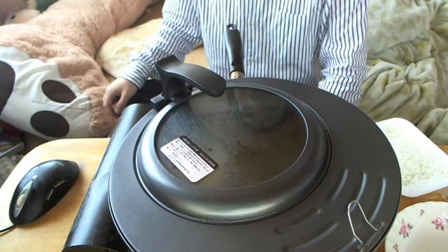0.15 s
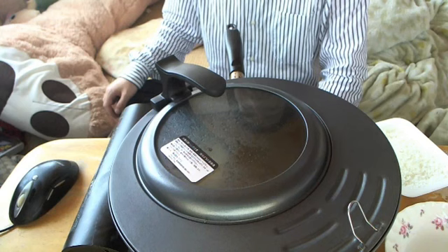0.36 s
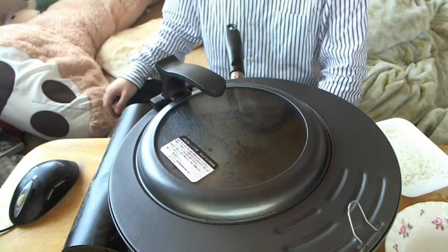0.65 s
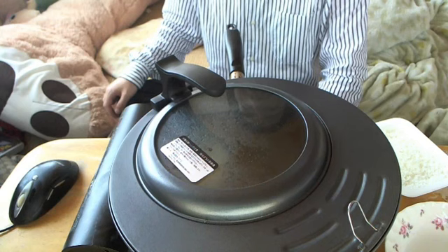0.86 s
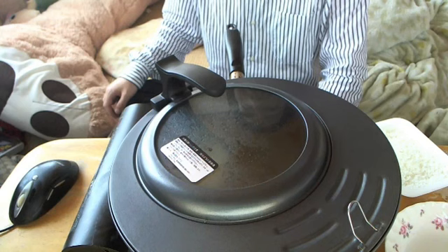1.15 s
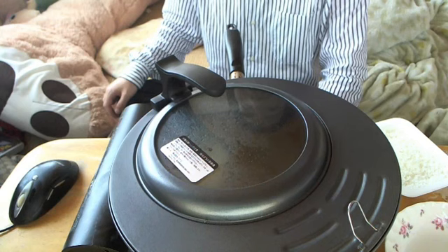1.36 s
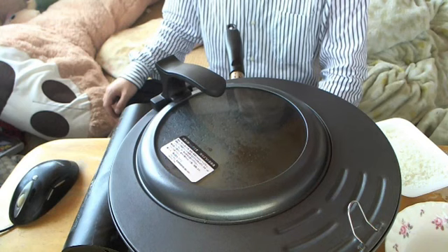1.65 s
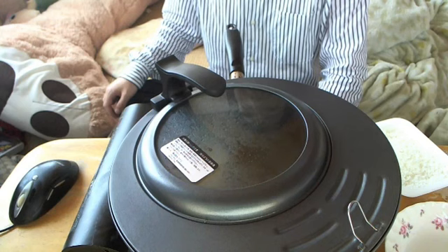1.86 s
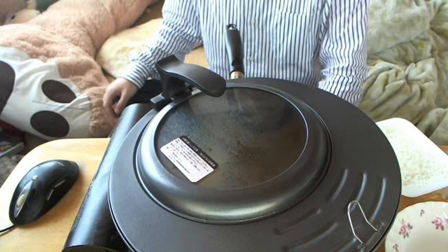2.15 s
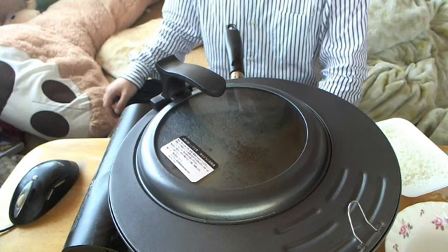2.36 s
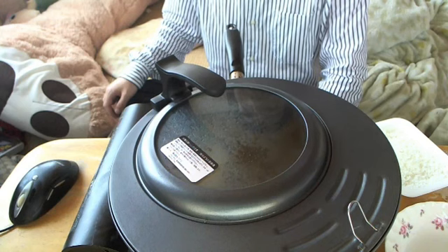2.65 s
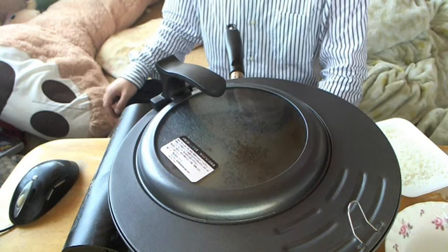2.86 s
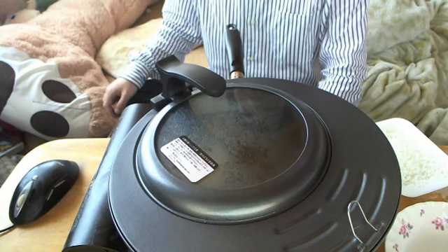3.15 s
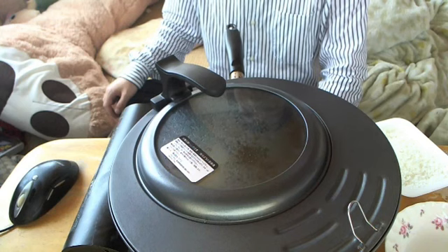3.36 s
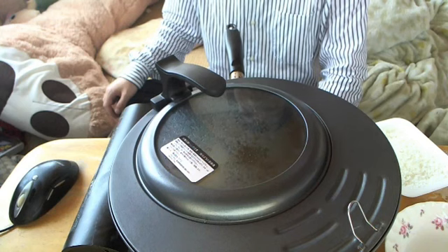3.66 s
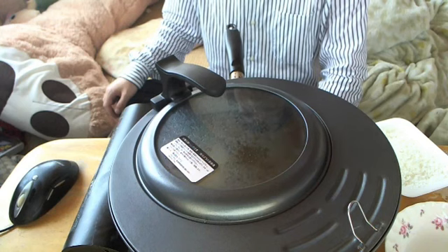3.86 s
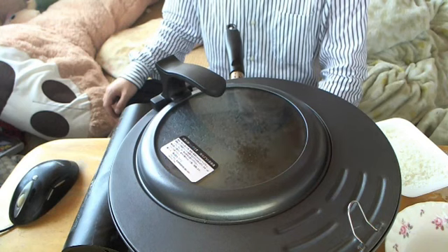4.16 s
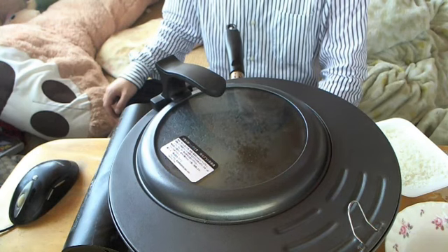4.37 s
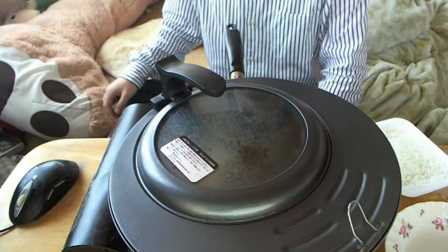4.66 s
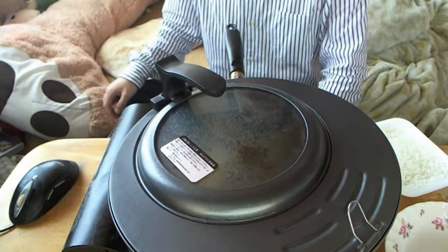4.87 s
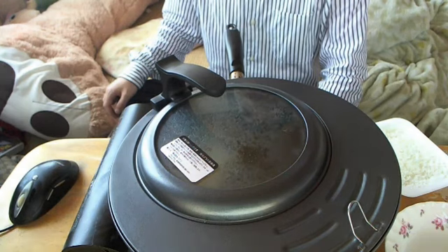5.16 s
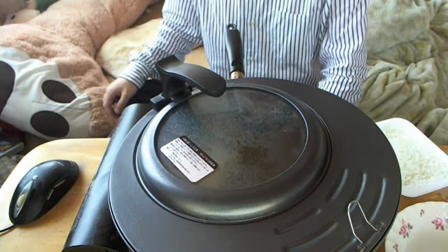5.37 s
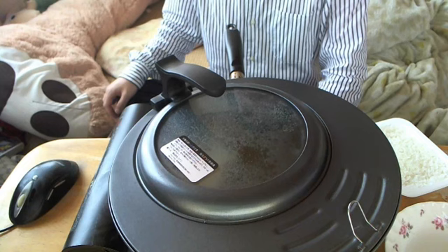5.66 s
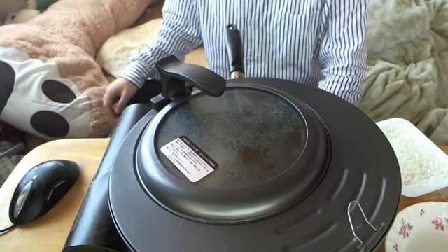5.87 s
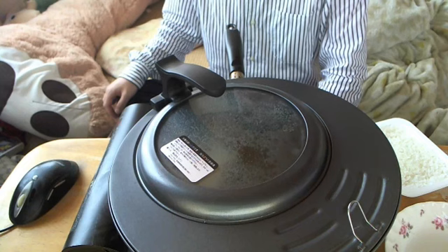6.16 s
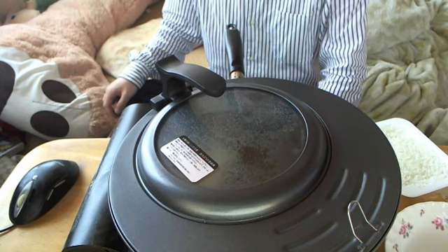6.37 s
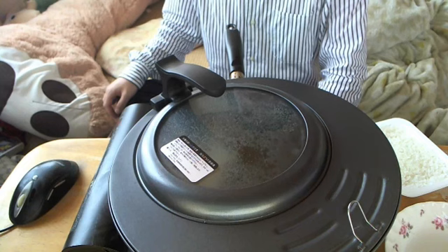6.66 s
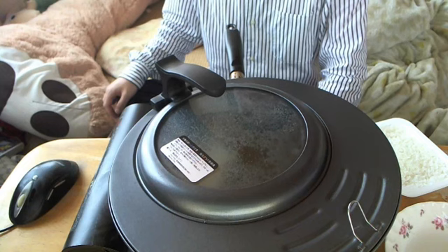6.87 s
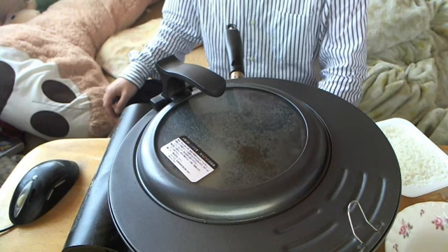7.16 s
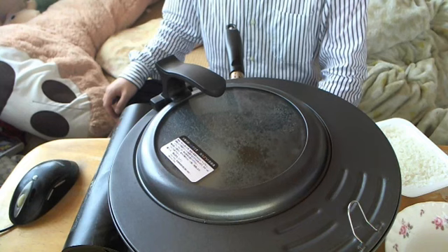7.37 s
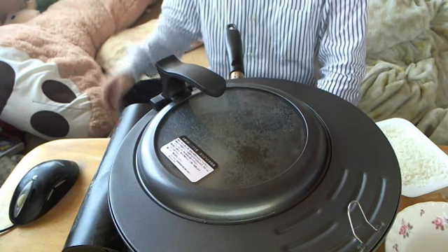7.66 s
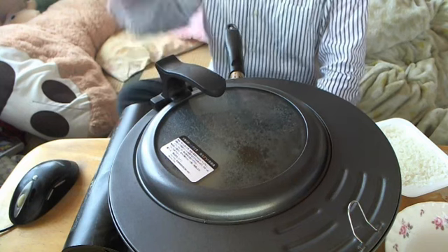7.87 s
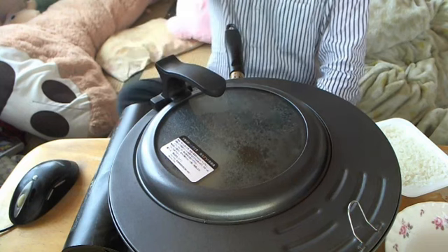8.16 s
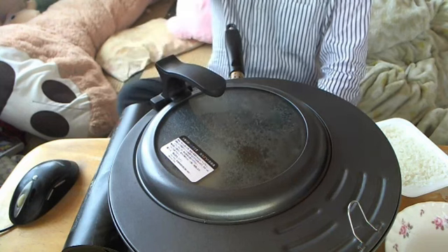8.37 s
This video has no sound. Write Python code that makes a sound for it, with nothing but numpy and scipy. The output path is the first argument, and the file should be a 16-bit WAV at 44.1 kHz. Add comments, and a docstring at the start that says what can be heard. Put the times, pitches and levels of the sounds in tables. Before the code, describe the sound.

Food fries in hot oil inside a closed metal pot, close to the microphone in a room. A soft, steady sizzle and a wavering low rumble run underneath many small, irregular crackles and pops that ring briefly in the pot. A louder, hollow pop comes about a third of the way in, followed by a sharp spit of oil against the lid. The crackling carries on, with another cluster of stronger pops near the end.

```python
"""Steam bubbles burst in frying oil under the closed lid of a pot, close to a small microphone.
Each burst is a flurry of clicks in a pitch range of its own that rings in the pot, with froth around it.
A few big ones splash oil on the lid and make the pot shudder. Underneath are many small bursts,
a steady sizzle and a wavering low rumble; the table under the pot adds a faint, short echo."""
import sys
import numpy as np
from scipy import signal
from scipy.fft import rfft, irfft
from scipy.io import wavfile
from scipy.ndimage import uniform_filter1d

SR = 44100
rng = np.random.default_rng(int(sys.argv[2]) if len(sys.argv) > 2 else 0)


def unload_wav(signal):
    """Save mono or channel-first audio to the path in sys.argv[1] as 16-bit WAV at rate SR, clipped to [-1, 1]."""
    wavfile.write(
        sys.argv[1],
        SR,
        np.round(np.clip(np.atleast_2d(signal).T, -1, 1) * 32767).astype(np.int16),
    )


N = 375732

# Steam bubbles that burst. Each row: start in seconds, level in dB, pitch in Hz.
STEAM_POPS = [(0.004, -28.5, 363), (0.006, -29, 923), (0.164, -39, 2500), (0.175, -36.5, 1120),
              (0.273, -40, 2420), (0.321, -44.5, 2100), (0.446, -47, 1630), (0.475, -38.5, 1730),
              (0.478, -47.5, 4100), (0.554, -39.5, 665), (0.646, -37.5, 1670), (0.693, -33, 5440),
              (0.702, -46, 7340), (0.733, -31, 2050), (0.763, -32.5, 1720), (0.778, -38, 520),
              (0.805, -46.5, 4170), (0.983, -31.5, 610), (1.08, -46.5, 4900), (1.124, -40, 2000),
              (1.178, -33, 4070), (1.23, -35, 1316), (1.27, -37.5, 347), (1.312, -35, 2390),
              (1.314, -42.5, 5140), (1.33, -43, 346), (1.368, -41.5, 3980), (1.426, -38.5, 5800),
              (1.444, -46, 5940), (1.486, -41, 306), (1.581, -44.5, 2000), (1.657, -37.5, 1210),
              (1.667, -38.5, 4900), (1.671, -29, 2000), (1.796, -43.5, 1530), (1.935, -28.5, 2000),
              (1.972, -29, 334), (1.985, -36.5, 1700), (2.059, -41, 5800), (2.062, -26.5, 1640),
              (2.103, -41.5, 5100), (2.106, -38, 2000), (2.158, -29.5, 1620), (2.176, -38.5, 5200),
              (2.19, -37.5, 3040), (2.222, -44.5, 7500), (2.484, -40.5, 5180), (2.715, -41.5, 1770),
              (2.734, -33, 1840), (2.735, -42.5, 5750), (2.781, -35.5, 201), (2.874, -48.5, 4500),
              (2.997, -33.5, 2080), (3.008, -18, 320), (3.006, -14.5, 596), (3.015, -21, 870),
              (3.037, -28.5, 2050), (3.059, -27, 830), (3.059, -39.5, 5640), (3.127, -37.5, 4880),
              (3.182, -41, 5260), (3.205, -34.5, 1490), (3.272, -41, 2280), (3.341, -35, 1990),
              (3.351, -38, 493), (3.442, -30, 2000), (3.627, -41.5, 1990), (3.717, -41, 2000),
              (3.783, -36, 5220), (3.783, -36.5, 1570), (3.831, -14.5, 2980), (3.874, -22, 299),
              (3.968, -34, 2670), (3.98, -31.5, 302), (4.107, -38.5, 3340), (4.182, -42.5, 1630),
              (4.327, -50, 7200), (4.356, -42.5, 2520), (4.481, -40, 4970), (4.547, -38, 1790),
              (4.554, -41.5, 4580), (4.627, -42.5, 5220), (4.661, -38.5, 368), (4.66, -32, 1300),
              (4.701, -31, 946), (4.709, -35.5, 347), (4.754, -39.5, 3640), (4.806, -39, 5150),
              (4.851, -40, 3570), (4.936, -34.5, 368), (4.976, -33, 1780), (5.008, -29.5, 1200),
              (5.05, -30.5, 2000), (5.09, -42.5, 813), (5.23, -48.5, 3800), (5.338, -40, 2130),
              (5.397, -20, 1224), (5.399, -46.5, 5050), (5.406, -24, 473), (5.481, -32, 2000),
              (5.605, -43.5, 1970), (5.696, -42, 2270), (5.697, -47, 4950), (5.921, -39, 3830),
              (5.962, -37, 1840), (6.013, -41, 6840), (6.025, -28.5, 1530), (6.052, -37, 5040),
              (6.154, -34.5, 5000), (6.156, -40, 2700), (6.211, -45, 1600), (6.271, -40, 5200),
              (6.293, -38, 5530), (6.299, -40, 2000), (6.355, -38, 5130), (6.424, -27.5, 2000),
              (6.476, -44.5, 5760), (6.599, -37.5, 4940), (6.602, -36, 1760), (6.624, -33.5, 1776),
              (6.631, -32, 955), (6.686, -33.5, 1200), (6.709, -37.5, 1900), (6.746, -27.5, 1650),
              (6.9, -40, 1770), (6.922, -47, 4800), (6.982, -40, 308), (7.015, -30.5, 256),
              (7.029, -36, 1530), (7.033, -33.5, 694), (7.07, -49, 4230), (7.103, -38.5, 4800),
              (7.104, -47.5, 8260), (7.129, -37.5, 5400), (7.185, -37, 5170), (7.211, -44, 2000),
              (7.297, -36, 5700), (7.385, -37, 2000), (7.401, -34.5, 2000), (7.448, -26.5, 313),
              (7.447, -21.5, 550), (7.54, -32, 334), (7.544, -21, 1230), (7.648, -34, 820),
              (7.725, -27, 1000), (7.734, -24, 325), (7.744, -29, 365), (7.742, -18.5, 844),
              (7.75, -26.5, 2800), (7.784, -43, 775), (7.832, -39.5, 6170), (7.834, -43.5, 3040),
              (7.857, -48, 5100), (7.892, -46.5, 4270), (7.972, -27, 1300), (7.98, -39.5, 318),
              (8.169, -51, 3700), (8.43, -45, 765)]
# Oil thrown on the lid. Each row: start in seconds, level in dB, pitch in Hz, length in ms.
LID_SPLASHES = [(0.099, -36.5, 7940, 10.6), (3.808, -9.5, 4540, 30), (3.876, -16, 6200, 12),
                (3.972, -42, 6400, 9.9), (7.746, -24.5, 5050, 18.7)]
# The pot's air and metal. Each row: resonance in Hz, width in Hz, level in dB over the broad response.
POT_MODES = [(194.4, 56, 16.5), (334, 48, 11.5), (610, 980, 4.5), (833.6, 20, 14), (1056, 46, 17),
             (1670, 65, 8.5), (2000, 65, 11.5), (2420, 430, 0.5), (2784, 14.5, 8), (3280, 134, -16),
             (3457, 39, 8.5), (3613, 42, 8.5), (3880, 26, 7), (4195, 120, 7.5), (4680, 15, 5.5),
             (5030, 325, 7), (5420, 27, 9), (6180, 106, 4.5), (6890, 53, 6.5), (7200, 83, 2.5),
             (8200, 104, 3.5), (8830, 17, 3)]
# How wide a pop's band is. Each row: pitch in Hz, width as a ratio of the pitch.
BREADTH_BY_PITCH = [(330, 1), (1200, 1), (2500, 1), (5500, 0.59), (10000, 0.9)]


def amp(db):
    """Gain of a dB value."""
    return 10 ** (np.asarray(db) / 20)


def at_hz(points, hz):
    """A curve read on a log-frequency axis."""
    point_hz, values = np.transpose(points)
    return np.interp(np.log(hz), np.log(point_hz), values)


def bins(size):
    """Frequencies in Hz of an FFT of that size."""
    return np.maximum(np.arange(size // 2 + 1) * SR / size, 1)


def band(f, hz, width_hz):
    """Response of a resonance, 1 at its peak."""
    return 1 / (1 + 1j * (f - hz * hz / f) / width_hz)


def drift(rate_hz):
    """A slow random wander with a spread of 1."""
    hop, settle = 40, 2000
    pole = np.exp(-2 * np.pi * rate_hz * hop / SR)
    noise = rng.standard_normal(N // hop + settle + 2)
    slow = signal.lfilter([1], [1, -2 * pole, pole * pole], noise)[settle:]
    return np.interp(np.arange(N) / hop, np.arange(len(slow)), slow / slow.std())


def pot(f, boost_db=0, lid_cut_hz=8730):
    """The closed pot: resonances, at least 25 Hz wide, on a broad response; the lid muffles the top."""
    hz, width, db = np.transpose(POT_MODES)
    rings = 1 + amp(db + boost_db) @ band(f, hz[:, None], np.maximum(width, 25)[:, None])
    return rings / (1 + 1.2j * f / lid_cut_hz - (f / lid_cut_hz) ** 2) ** 2


def bursts(rows, breadth, rise, grain_db, sputter_db, fade_db, ring_db=0, size=8192):
    """Flurries of uneven clicks that swell, sputter and die, coloured by their pitch and by the pot."""
    start_s, db, hz, ms = np.transpose(rows)[:, :, None]
    t, f = np.arange(size // 2) * 1000 / SR / ms, bins(size)   # t and rise are in burst lengths
    noise, grain, chance = rng.standard_normal((len(rows), 3, size // 2)).swapaxes(0, 1)
    lumps = uniform_filter1d(uniform_filter1d(chance, size=130), size=130)   # a few ms each
    clicks = noise * amp(grain_db * grain + sputter_db * lumps / lumps.std())
    own_rise = rise * amp(2.5 * chance[:, :1])   # some bursts crack, others swell
    swell = 1 - np.exp(-(t / own_rise) ** 2)
    flurry = clicks * swell * amp(-9.5 * t - fade_db * t * t)
    body = band(f, hz, breadth * hz) ** 4
    bubble_note = amp(-5) * band(f, hz, 0.12 * hz)
    spray = amp(-27) * f / (f + hz) / (1 + (f / hz / 6.7) ** 2) ** 2   # reaches far above the pitch
    ring = pot(f, ring_db + 3 * grain[:, -len(POT_MODES):])   # each burst excites the modes differently
    sound = irfft(rfft(flurry, size) * (body * (1 + bubble_note) + spray) * ring, size)
    peak_power = uniform_filter1d(sound ** 2, size=350).max(axis=1, keepdims=True)   # loudest 8 ms
    sound *= amp(db) / np.sqrt(peak_power)
    out = np.zeros(N + size)
    for start, burst in zip(np.clip(start_s[:, 0] * SR, 0, N).astype(int), sound):
        out[start:start + size] += burst
    return out[:N]


def sizzle_and_port_noise(level_db):
    """Countless tiny bubbles: flickering noise through the pot. The microphone ports add their own."""
    # The sizzle before the pot colours it. Each row: frequency in Hz, relative density in dB.
    sizzle_colour = [(30, -22), (106, -17), (192, -9), (273, -10.5), (739, -10), (1490, -16.5), (2000, -15),
                     (3140, -29.5), (5040, -18.5), (7150, -19), (10000, -23), (15500, -32)]
    # Noise of the ports. Each row: frequency in Hz, density in dB on the sizzle's scale.
    port_colour = [(30, -36), (60, -44), (200, -6.5), (700, -23.5), (4000, -62), (10000, -57)]
    f = bins(N)
    spectrum = rfft(rng.standard_normal(N)) * amp(at_hz(sizzle_colour, f)) * np.abs(pot(f)) ** 0.9
    port_noise = irfft(rfft(rng.standard_normal(N)) * amp(at_hz(port_colour, f)), N)
    gain = amp(level_db) / irfft(spectrum, N).std()
    edges_hz = [0, 140, 280, 600, 1300, 2600, 4200, 6500, SR]
    common_db, sizzle = 1.2 * drift(3.0), 0
    for low, high in zip(edges_hz, edges_hz[1:]):
        flicker_db = 2.5 if low == 140 else 1.2   # the rumble near the lowest resonance wavers most
        part = irfft(spectrum * (f >= low) * (f < high), N)
        sizzle += part * amp(common_db + flicker_db * drift(5.0))
    return gain * sizzle, gain * port_noise


def small_bursts(count, low_hz, pitch_span_db, least_db, spread_db, ms, breadth=0.45):
    """Faint bubbles of random pitch and length; about a third trail the pops, the rest fall anywhere."""
    when, loud, pitch, length, parent, lag, trails = rng.random((count, 7)).T
    pop_s = np.array(STEAM_POPS)[(parent * len(STEAM_POPS)).astype(int), 0]
    trailing_s = pop_s - 0.077 * np.log(1 - lag)   # 77 ms later on average
    start_s = np.where(trails < 0.35, trailing_s, when * N / SR)
    level_db = least_db - spread_db * np.log(1 - 0.95 * loud)
    rows = np.transpose([start_s, level_db, low_hz * amp(pitch_span_db * pitch), ms * (0.19 + length)])
    return bursts(rows, breadth, rise=0.67, grain_db=3.5, sputter_db=1.0, fade_db=5.5, size=4096)


def froth(rows):
    """Froth around each pop: a murmur before it and a soft bubbling after, both slightly higher."""
    # Each row: delay in pop lengths, level in dB relative to the pop, pitch ratio, length ratio.
    froth_layers = [(-0.79, -17, 1.08, 2.1), (0.7, -16, 1.07, 1.5)]
    bubbles = np.array([(s + lag * ms / 1000, db + offset_db, hz * higher, ms * longer)
                        for s, db, hz, ms in rows for lag, offset_db, higher, longer in froth_layers])
    breadth = at_hz(BREADTH_BY_PITCH, bubbles[:, 2:3])
    return bursts(bubbles, breadth, rise=0.44, grain_db=3.5, sputter_db=5.0, fade_db=3.0)


def oil_splashes():
    """Oil hits the lid: a bright, broad hiss that sets the pot ringing hard."""
    return bursts(LID_SPLASHES, breadth=2.75, rise=0.21, grain_db=1.5, sputter_db=3.5, fade_db=0.2,
                  ring_db=22.0)


def shudder_rows():
    """The pot shudders under each splash: burst rows for a few lower, longer pops."""
    # Each row: pitch in Hz, level in dB relative to the splash, length in splash lengths.
    shudder = [(320, -13, 1.5), (1200, -13.5, 1.5), (2500, -28.5, 2.8)]
    return [(s, db + offset_db, hz, ms * longer)
            for s, db, _, ms in LID_SPLASHES for hz, offset_db, longer in shudder]


def pop_rows():
    """Burst rows for the steam bubbles, each as long as its pitch dictates."""
    # Each row: pitch in Hz, length in ms.
    length_by_pitch = [(330, 15.3), (500, 17), (1000, 24), (2000, 20), (5500, 15)]
    return [(s, db, hz, at_hz(length_by_pitch, hz)) for s, db, hz in STEAM_POPS]


def steam_pops(rows):
    """Steam bubbles burst one by one, each with a quick attack and a grainy tail."""
    # Each row: pitch in Hz, swell time in burst lengths.
    rise_by_pitch = [(330, 0.16), (1200, 0.16), (2500, 0.17), (6000, 0.26)]
    hz = np.array(rows)[:, 2:3]
    breadth, rise = at_hz(BREADTH_BY_PITCH, hz), at_hz(rise_by_pitch, hz)
    return bursts(rows, breadth, rise, grain_db=3.0, sputter_db=2.0, fade_db=1.0)


def microphone(sound, port_noise):
    """The two ports differ a little in colour; table echo and port noise reach them in opposite phase."""
    # Each row: frequency in Hz, level of left over right in dB.
    balance = [(60, 5), (170, 3), (500, 0.4), (1200, 0.9), (2200, 0), (3600, 0.5), (4600, 1.5),
               (5500, -1.3), (6500, 1), (8000, -0.5), (10000, -0.5)]
    mid, f = rfft(sound), bins(N)
    tilt = amp(at_hz(balance, f) / 2)
    echo_colour = amp(-18.5) * band(f, 3720, 1200) ** 2 + amp(-39) * band(f, 4700, 2500) ** 2
    table_echo = echo_colour * np.exp(-2j * np.pi * f * 0.00057)   # 0.57 ms late
    left = irfft(mid * (tilt + table_echo), N) + port_noise
    right = irfft(mid * (1 / tilt - table_echo), N) - port_noise
    return np.array([left, right])


def scene():
    """The frying pot stands straight in front of the microphone."""
    sizzle, port_noise = sizzle_and_port_noise(level_db=-53)
    rows = pop_rows() + shudder_rows()
    foreground = steam_pops(rows) + oil_splashes() + froth(rows)
    spits = small_bursts(1000, low_hz=1300, pitch_span_db=15.5, least_db=-64, spread_db=5.5, ms=13.4)
    droplets = small_bursts(260, low_hz=4000, pitch_span_db=8, least_db=-65, spread_db=4.5, ms=11,
                            breadth=1.7)
    glugs = small_bursts(90, low_hz=173.8, pitch_span_db=13.5, least_db=-51.5, spread_db=0, ms=28)
    return microphone(sizzle + spits + droplets + glugs + foreground, port_noise)


def record(dry):
    """Peaks are rounded near full scale; the deepest bass and the very top are cut."""
    ceiling, low_cut_hz, high_cut_hz = 1.1, 42.0, 16000
    rounded = ceiling * np.tanh(dry / ceiling)
    trimmed = signal.sosfilt(signal.butter(2, low_cut_hz, "high", fs=SR, output="sos"), rounded)
    return signal.sosfilt(signal.cheby2(12, 70, high_cut_hz, fs=SR, output="sos"), trimmed)


dry = scene()
out = record(dry)
unload_wav(out)
```